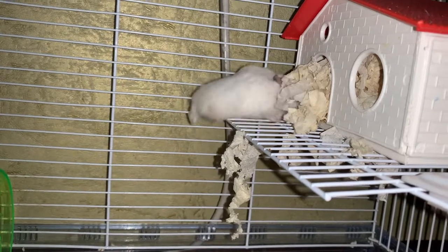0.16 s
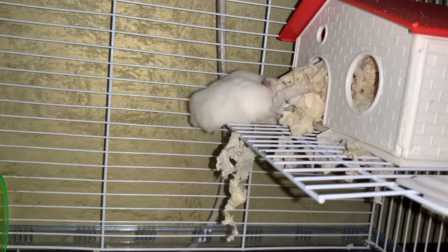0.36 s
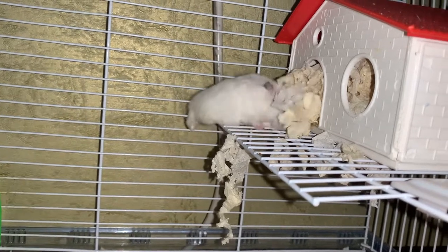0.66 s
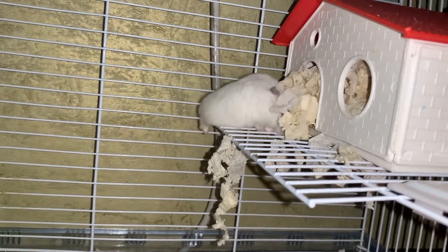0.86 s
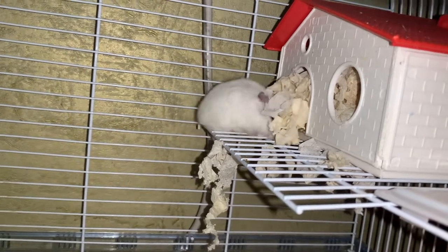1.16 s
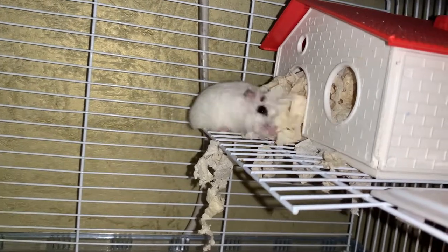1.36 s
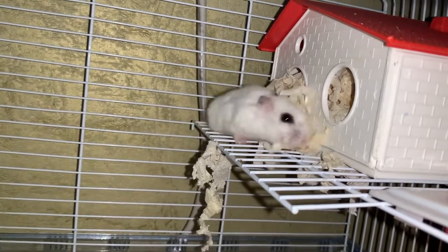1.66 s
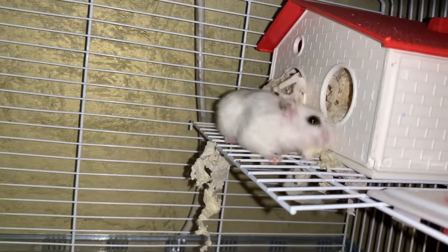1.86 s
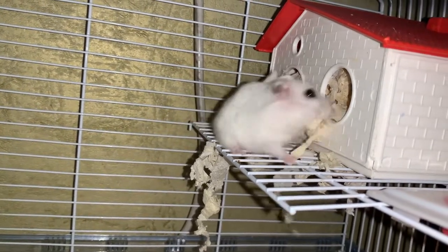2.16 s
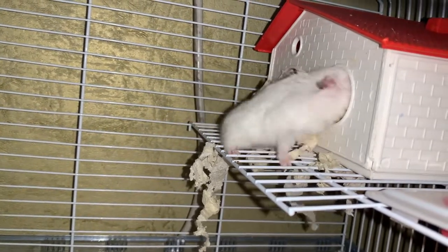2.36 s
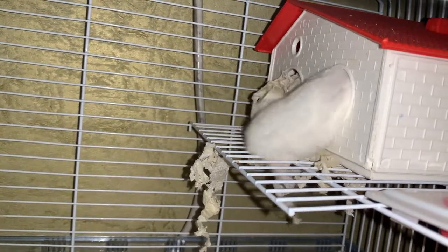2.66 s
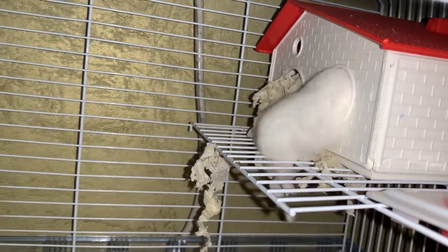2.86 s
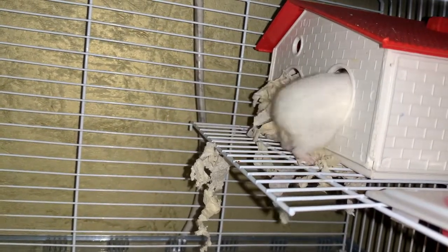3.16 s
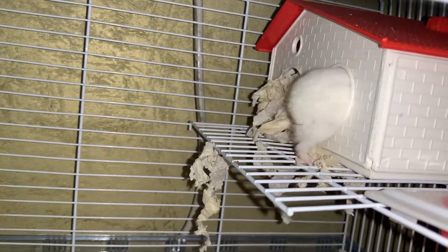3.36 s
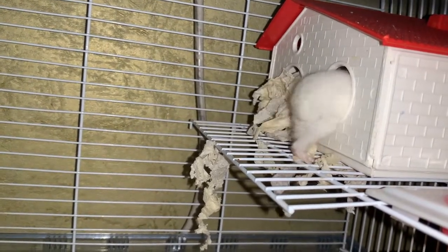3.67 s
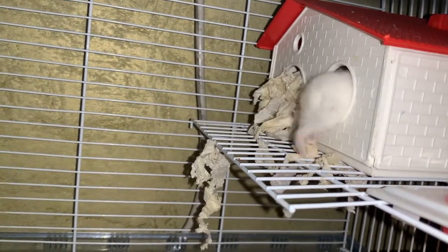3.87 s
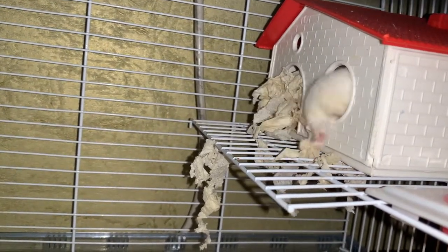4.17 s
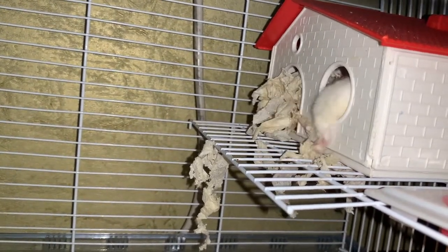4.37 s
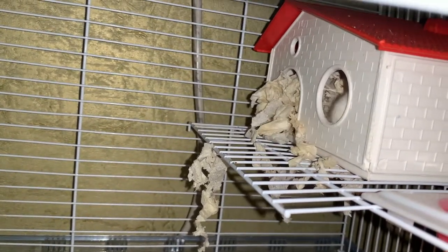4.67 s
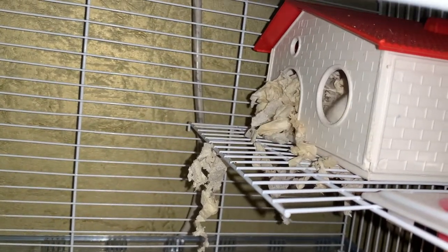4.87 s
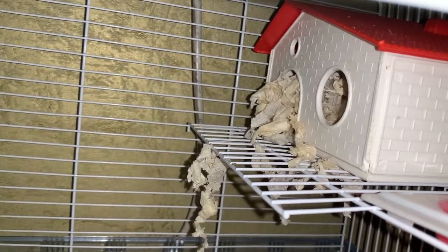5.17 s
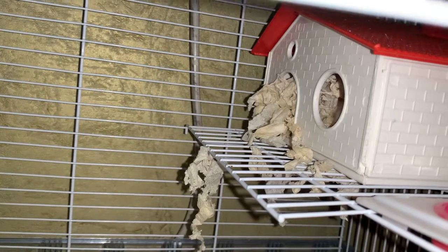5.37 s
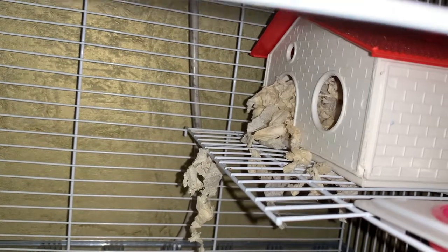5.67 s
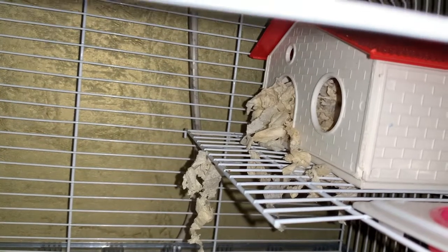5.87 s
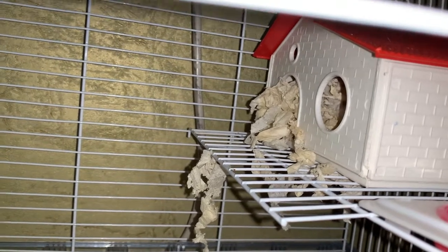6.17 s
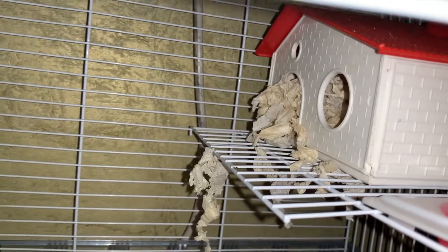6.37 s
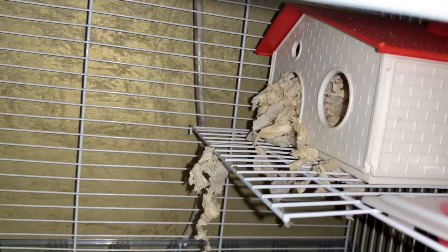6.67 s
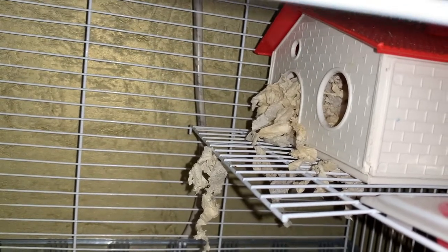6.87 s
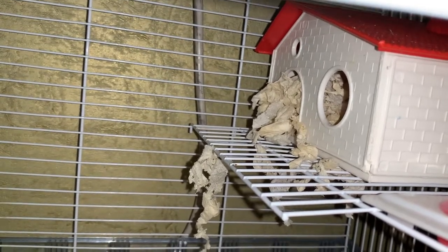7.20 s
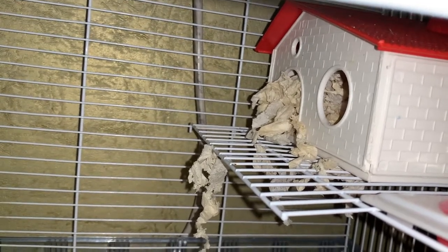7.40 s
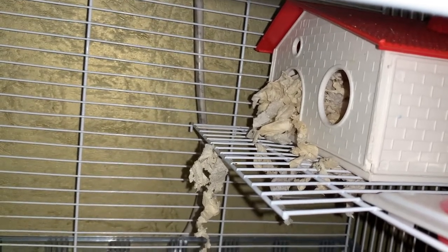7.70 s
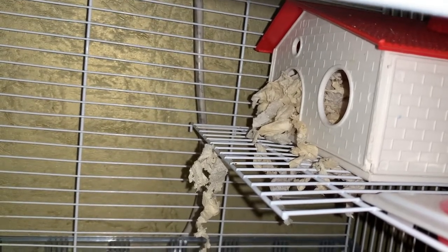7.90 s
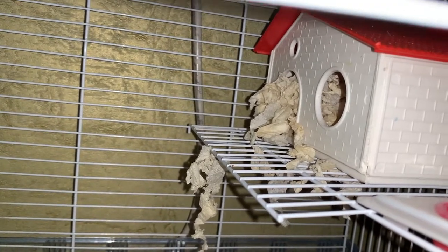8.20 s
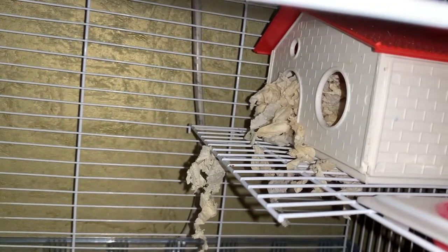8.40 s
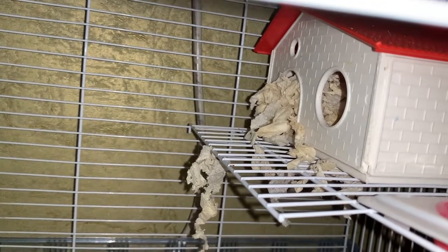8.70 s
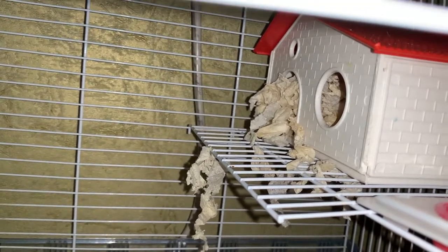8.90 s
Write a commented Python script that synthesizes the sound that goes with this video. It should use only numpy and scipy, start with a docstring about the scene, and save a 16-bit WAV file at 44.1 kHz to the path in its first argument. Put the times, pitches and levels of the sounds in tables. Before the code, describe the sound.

A hamster's claws tick on cage wire and paper bedding rustles softly, with dull plastic knocks over a low room hum.

```python
"""Mains hum, a slowly rising motor whine and rumble fill a quiet room; at once, claws tick on wire.
A hamster climbs over a wire shelf into a plastic house stuffed with paper, close to a two-port
microphone. Pushed paper rustles in tiny snaps, contacts ring the house walls as dull knocks,
and rubbed wires sing briefly. Later, scuffs excite the air inside the house."""
import sys
import numpy as np
from scipy import signal
from scipy.fft import rfft, irfft, next_fast_len
from scipy.io import wavfile
from scipy.ndimage import uniform_filter1d

SR = 44100
rng = np.random.default_rng(int(sys.argv[2]) if len(sys.argv) > 2 else 0)


def unload_wav(signal):
    """Save mono or channel-first audio to the path in sys.argv[1] as 16-bit WAV at rate SR, clipped to [-1, 1]."""
    wavfile.write(
        sys.argv[1],
        SR,
        np.round(np.clip(np.atleast_2d(signal).T, -1, 1) * 32767).astype(np.int16),
    )


N = 398884


def amp(db):
    """Decibels to gain."""
    return 10 ** (np.asarray(db) / 20)


def unit_rms(x):
    """Scale to rms 1."""
    return x / np.sqrt(np.mean(x ** 2) + 1e-20)


def over_frequency(rows, hz):
    """Table columns interpolated over log frequency."""
    row_hz, *columns = np.transpose(rows)
    return [np.interp(np.log(hz + 1), np.log(row_hz + 1), c) for c in columns]


def over_time(rows):
    """A (t/s, value) curve at every sample."""
    return np.interp(np.arange(N) / SR, *np.transpose(rows))


def drift(knots_per_s):
    """Random wander between unit-variance knots."""
    return np.interp(np.arange(N) / SR * knots_per_s, np.arange(400), rng.standard_normal(400))


def colour(x, gain):
    """Filter by a gain function of frequency."""
    size = next_fast_len(x.shape[-1])
    spectrum = rfft(x, size) * gain(np.fft.rfftfreq(size, 1 / SR))
    return irfft(spectrum, size)[..., :x.shape[-1]]


def resonance(hz, centre_hz, width_hz):
    """Gain of one resonance."""
    return 1 / np.sqrt(1 + (2 * (hz - centre_hz) / width_hz) ** 2)


def band_power(bands, hz):
    """Summed power of steep resonant bands."""
    return sum((amp(db) * resonance(hz, f, width_hz) ** 2) ** 2 for f, width_hz, db in bands)


def add(mix, start_s, sound):
    """Mix a sound in at start_s."""
    part = mix[:, max(round(start_s * SR), 0):][:, :sound.shape[1]]
    part += sound[:, :part.shape[1]]


def tone(hz, db, pan_db, lead_rad):
    """A sine on both ports; the left is louder by pan_db and ahead by lead_rad."""
    phase = 2 * np.pi * (np.cumsum(hz * np.ones(N)) / SR + rng.random())
    return np.sqrt(2) * amp(db) * np.array([np.sin(phase), amp(-pan_db) * np.sin(phase - lead_rad)])


# Third harmonic of the hum: t/s, level/dB
HUM_THIRD = [(0, -60), (2.2, -58), (3.0, -66.5), (3.8, -87), (6.4, -78.5), (7.1, -60), (9.04, -57.5)]
# Steady tones: f/Hz, level/dB, pan/dB, left lead/rad
STEADY_TONES = [(99.97, -53.5, 8, 1)]


def mains_hum():
    """Two hums a fraction of a hertz apart beat, beside a third harmonic and a steady tone."""
    weaker_ratio, beat_hz, quietest_s = 0.54, 0.14, 4.71
    t = np.arange(N) / SR
    beat = abs(1 - weaker_ratio * np.exp(2j * np.pi * beat_hz * (t - quietest_s)))
    hum = beat * tone(120.03, -46 + 0.62 * drift(6.3), pan_db=5.6, lead_rad=0.57)
    third = tone(360.1, over_time(HUM_THIRD) + 1.2 * drift(7.6), pan_db=5.5, lead_rad=-0.9)
    steady = sum(tone(hz, db + 2 * drift(5.1), pan, lead) for hz, db, pan, lead in STEADY_TONES)
    return hum + third + steady


# Motor pitch: t/s, f/Hz
MOTOR_PITCH = [(0, 270.4), (.5, 275.3), (1.2, 289.1), (1.7, 301.1), (2.1, 306.5), (2.6, 310), (6.8, 311.3),
               (7.45, 316.6), (7.9, 320.7), (8.3, 322.7), (8.65, 321.6), (9.04, 318.6)]
# Room response by motor pitch: f/Hz, whine/dB, upper tone/dB, even overtone base/dB
MOTOR_LEVELS = [(270, -58, -90, -95), (276, -69, -90, -92), (288, -64, -90, -95), (301, -53, -78, -91),
                (307, -55.5, -67, -90), (310, -58.5, -62.5, -91), (313, -58.5, -63, -90),
                (316.5, -52.5, -68, -82), (321, -56, -76, -82), (325, -57.5, -76, -85)]


def motor_whine():
    """Pitch follows motor speed; the room favours some pitches."""
    hz = over_time(MOTOR_PITCH)
    whine_db, upper_db, even_db = over_frequency(MOTOR_LEVELS, hz)
    whine = tone(hz, whine_db + drift(6), pan_db=3.34, lead_rad=0.71)
    upper = tone(1.1435 * hz, upper_db + 1.4 * drift(7.6), pan_db=6, lead_rad=-0.22)
    second = tone(2 * hz, even_db + 4, pan_db=7, lead_rad=-0.8)
    fourth = tone(4 * hz, even_db - 2, pan_db=8, lead_rad=-0.9)
    return whine + upper + second + fourth


# Room and microphone noise, left port: f/Hz, density/(dB per Hz)
ROOM_FLOOR = [(20, -100), (40, -81), (60, -76), (150, -74), (260, -84), (500, -93), (660, -101.5),
              (780, -105), (1200, -105.5), (2000, -113), (3500, -119.5), (6000, -124), (9500, -122),
              (15500, -126)]
# Narrow bands above that floor: f/Hz, width/Hz, peak density/(dB per Hz)
ROOM_BANDS = [(182.8, 6.5, -68.5), (232, 8.8, -72), (912, 14, -100), (1350, 6, -103), (1580, 20, -105),
              (2360, 20, -109), (2490, 14, -108), (2970, 25, -112), (3640, 25, -114), (10100, 69, -118),
              (11380, 90, -116)]


def room_rumble():
    """Low noise with a few narrow bands, gently swelling."""
    def timbre(hz):
        return np.sqrt(amp(over_frequency(ROOM_FLOOR, hz)[0]) ** 2 + band_power(ROOM_BANDS, hz))
    noise = colour(rng.standard_normal((2, N)), timbre) * np.sqrt(SR / 2)
    return noise * amp(0.7 * drift(4))


# Claws on the wire: t/s, level/dB, body re tick/dB
CLAW_TICKS = [(.031, -64.5, -13), (.388, -72, -10), (0.095, -68, -6), (.716, -64, -20), (.726, -67, -20),
              (.95, -63.5, -5), (1.386, -54, -14), (1.431, -55.5, -1), (1.4457, -53, -9), (1.464, -52, -10),
              (1.501, -52, -15), (1.522, -53, -5), (1.545, -59, -12), (1.562, -55, -21),
              (1.7185, -58.5, -10), (1.7722, -66, -19), (1.855, -59, -25), (1.9654, -56.5, -27),
              (2.0214, -53, -24), (2.086, -52, -23), (2.0942, -47.5, -11), (2.0975, -46.5, -18),
              (2.167, -65.5, -2), (2.176, -71, -13), (2.251, -60, -17), (2.2572, -43.5, -13),
              (2.2595, -45, -12), (2.2753, -47, -12), (2.282, -54, -14), (2.3805, -60, -8),
              (2.42, -62.5, -3), (2.505, -64, -3), (2.651, -65, -6), (3.0794, -70, -6), (4.0428, -70, -20),
              (4.1895, -73.5, -16), (4.2197, -70, -19)]


def claw_ticks():
    """A claw on wire gives a bright burst with a weaker body; harder ticks are shorter."""
    soft_db, soft_rise_s, soft_t60_s, halving_db = -61, 0.0028, 0.03, 14
    corners_hz = [500, 2000, 5000, 7500]
    out, t = np.zeros((2, N)), np.arange(4096) / SR
    for at_s, db, body_db in CLAW_TICKS:
        corners_db = [body_db - 25, body_db, body_db, 0]
        burst = colour(rng.standard_normal((2, len(t))),
                       lambda hz: amp(np.interp(hz, corners_hz, corners_db)))
        stretch = 2 ** ((soft_db - db) / halving_db)
        rise_s, t60_s = soft_rise_s * stretch, soft_t60_s * stretch
        envelope = np.minimum(t / rise_s, 1) * amp(-60 * np.maximum(t - rise_s, 0) / t60_s)
        add(out, at_s - rise_s / 2, amp(db) * unit_rms(burst) * envelope)
    return out


# Bouts of pushing paper: t/s, length/s, level/dB
PAPER_BOUTS = [(0.075, 0.015, -79), (0.196, 0.016, -75), (0.38, 0.072, -71), (0.448, 0.054, -67.5),
               (.52, .09, -73), (.621, .028, -66), (.66, .04, -73), (0.702, 0.023, -62.5),
               (0.736, 0.038, -60), (0.771, 0.031, -67.5), (0.807, 0.15, -68.5), (1.367, .11, -71.5),
               (1.473, .16, -63.5), (1.689, 0.21, -68.5), (1.907, 0.115, -70.5), (2.01, 0.1, -66.5),
               (2.114, .04, -77), (2.156, 0.076, -71.5), (2.235, 0.063, -66), (2.309, 0.05, -62.5),
               (2.384, 0.04, -68), (2.44, .04, -76), (2.492, 0.037, -72), (2.54, 0.063, -77.5),
               (2.63, 0.075, -74), (3.038, 0.054, -78), (3.395, .015, -80), (3.6, .097, -77),
               (3.86, 0.058, -77), (4.03, 0.054, -74.5), (4.237, 0.076, -75.5), (4.403, 0.074, -76),
               (4.597, 0.15, -79.5), (5.502, 0.23, -83.5)]


def paper_envelope():
    """Each bout swells, holds unevenly and dies away; powers add."""
    rise_s, t60_s, stir_db = 0.026, 0.11, 1.5
    power, t = np.zeros(N), np.arange(N) / SR
    for start_s, length_s, db in PAPER_BOUTS:
        swell = np.clip((t - start_s) / rise_s + 0.5, 0, 1)
        fall_db = 60 * np.clip((t - start_s - length_s) / t60_s, 0, 2)
        power += (swell * amp(db - fall_db)) ** 2
    return np.sqrt(power) * amp(stir_db * drift(35))


# Paper spectrum: f/Hz, gain/dB
PAPER_SPECTRUM = [(500, 9), (1500, 8), (3000, -17), (5500, -17), (6500, -8), (8300, -4.5), (11000, -1.5),
                  (15000, -4.5)]
# Wires ringing with the rustle: f/Hz, width/Hz, gain/dB
WIRE_MODES = [(2410, 460, 2), (3260, 590, -0.5), (4400, 280, -3.5), (6950, 410, -3), (10000, 750, -5)]


def paper_rustle():
    """Dense tiny snaps of uneven size over a fizz, riding the animal's movements."""
    def timbre(hz):
        ring = sum(amp(db) * resonance(hz, f, width_hz) for f, width_hz, db in WIRE_MODES)
        return amp(over_frequency(PAPER_SPECTRUM, hz)[0]) + ring
    snaps_per_s, snap_decay_s, fizz, flare_db = 500, 0.0012, 2.5, 2
    sizes = amp(3 * np.minimum(rng.exponential(1, N), 5))
    impulses = sizes * (rng.random(N) < snaps_per_s / SR)
    snaps = signal.lfilter([1], [1, -np.exp(-1 / (snap_decay_s * SR))], impulses)
    grain = rng.standard_normal((2, N)) * (fizz + unit_rms(snaps))
    spectra = signal.stft(colour(grain, timbre), nperseg=256)[2]
    # Each scrap has its own colour: spectral patches flare and fade.
    patches = uniform_filter1d(rng.standard_normal(spectra.shape[1:]), size=5, axis=0)
    patches = unit_rms(uniform_filter1d(patches, size=20, axis=1))
    scraps = signal.istft(spectra * amp(flare_db * patches), nperseg=256)[1][:, :N]
    return unit_rms(scraps) * paper_envelope()


def contacts(rows, modes, rise_per_t60):
    """Each rough contact excites the modes near its own band."""
    out, t = np.zeros((2, N)), np.arange(16384) / SR
    for start_s, db, centre_hz, width_oct, t60_s in rows:
        def timbre(hz):
            offset_oct = np.log2(hz / centre_hz + 1e-9)
            return np.sqrt(band_power(modes, hz)) * np.exp(-0.5 * (offset_oct / width_oct) ** 2)
        ring = unit_rms(colour(rng.standard_normal((2, len(t))), timbre))
        rise_s = rise_per_t60 * t60_s
        envelope = np.minimum(t / rise_s, 1) ** 2 * amp(-60 * np.maximum(t - rise_s, 0) / t60_s)
        add(out, start_s, amp(db) * ring * envelope)
    return out


# Knocks and scrapes on the house: t/s, level/dB, f/Hz, width/oct, t60/s
HOUSE_KNOCKS = [(.612, -63, 1300, .5, .4), (.876, -54, 1300, .5, .3), (.891, -63, 2800, .7, .05),
                (.89, -61, 1150, .3, .7), (.885, -58, 620, .3, .25), (1.694, -54, 700, .7, .28),
                (1.705, -60, 900, .6, .06), (2.168, -66, 1400, .5, .2), (2.195, -64, 650, .4, .25),
                (2.325, -58, 1200, .5, .2), (2.62, -69, 2000, .5, .35), (2.962, -63, 600, .5, .1),
                (3.043, -65, 620, .5, .08), (6.118, -68, 700, .5, .07), (7.616, -67, 650, .5, .07),
                (8.462, -54, 1700, .15, .25), (8.468, -46.5, 620, .45, .2), (8.468, -52, 4600, .9, .2),
                (8.49, -65, 3000, .4, .24)]
# Wall modes: f/Hz, width/Hz, gain/dB
WALL_MODES = [(517, 290, 7), (637, 83, 12), (936, 200, 2.5), (1200, 560, -1.5), (1653, 300, -5),
              (2030, 420, -12), (2480, 820, -12.5), (3100, 180, -8.5), (3460, 260, -10), (4120, 220, -16),
              (4800, 300, -15), (5300, 190, -14), (6400, 4100, -32), (7450, 410, -27), (8450, 550, -19),
              (10070, 370, -17), (10500, 200, -18)]


def house_knocks():
    """The plastic walls ring dully when bumped."""
    return contacts(HOUSE_KNOCKS, WALL_MODES, rise_per_t60=0.057)


# Rubs on single wires: t/s, length/s, f/Hz, level/dB
WIRE_RUBS = [(.76, .09, 4500, -78), (.765, 0.22, 2330, -71.5), (1.439, 0.12, 4440, -74),
             (1.695, 0.086, 3310, -78), (1.70, .1, 4450, -86), (1.822, 0.077, 4540, -76.5),
             (1.887, 0.093, 4260, -83), (2.028, 0.09, 4430, -81), (2.301, .065, 4600, -77),
             (2.31, 0.037, 3220, -83), (2.44, 0.069, 4420, -79), (2.62, 0.064, 2750, -77),
             (2.77, 0.088, 2800, -86)]


def wire_rubs():
    """A rubbed wire sings: friction noise held in one narrow resonance."""
    out = np.zeros((2, N))
    for start_s, length_s, ring_hz, db in WIRE_RUBS:
        friction = rng.standard_normal((2, 12000))
        ring = unit_rms(colour(friction, lambda hz: resonance(hz, ring_hz, width_hz=100) ** 2))
        envelope = signal.windows.tukey(round(length_s * SR), 0.8)
        add(out, start_s, amp(db) * ring[:, :len(envelope)] * envelope)
    return out


# Scuffs inside the house: t/s, level/dB, f/Hz, width/oct, t60/s
HOUSE_SCUFFS = [(4.27, -72, 2200, .8, .35), (4.365, -72, 2200, .7, .12), (4.405, -69, 2200, .7, .3),
                (4.445, -71, 2100, .6, .25), (4.585, -73, 1800, .5, .2), (4.615, -68, 2200, .6, .35),
                (4.845, -73, 2600, .4, .35), (5.63, -70, 2000, .9, .5), (6.6, -67, 2150, .45, .42)]
# Modes of the enclosed air: f/Hz, width/Hz, gain/dB
AIR_MODES = [(1190, 200, 5.5), (1630, 150, 0), (1853, 110, 2.5), (2210, 200, -5), (2530, 210, -4),
             (2790, 200, -8), (3230, 150, -3), (3740, 330, -14), (4300, 580, -10)]


def house_scuffs():
    """Scuffs excite the air in the house, swelling more slowly than knocks."""
    return contacts(HOUSE_SCUFFS, AIR_MODES, rise_per_t60=0.077)


# Port pair: f/Hz, likeness/(0-1), left over right/dB, left lead besides the time offset/rad
PORT_RESPONSE = [(39, 0.04, 0, 1.5), (90.4, 0.64, -4.5, 1.49), (169, 0.81, 3.5, 1.15), (446, 0.26, 4, 0.18),
                 (1250, 0.78, 7, 0.63), (2140, 0, 4.5, 0.15), (3930, 0.26, 2, 0.43), (5770, 0, 0, 1.7),
                 (6600, 0.6, 1, 1.9), (7600, 1, -0.5, 1.53), (15100, 0.93, -1, 1.8)]


def microphone_ports(pair):
    """The right port hears a time- and phase-shifted copy of the left plus an unrelated part."""
    right_ahead_s = 0.000206
    def right_gains(hz):
        likeness, pan_db, lead_rad = over_frequency(PORT_RESPONSE, hz)
        likeness = np.clip(likeness, 0, 1)
        weights = np.array([likeness, np.sqrt(1 - likeness ** 2)])
        phase_rad = 2 * np.pi * hz * right_ahead_s - lead_rad
        return weights * amp(-pan_db) * np.exp(1j * phase_rad)
    return np.array([pair[0], colour(pair, right_gains).sum(0)])


def scene():
    """Noisy sources pass through the ports; tones carry their own direction."""
    noises = room_rumble() + claw_ticks() + paper_rustle() + house_knocks() + wire_rubs() + house_scuffs()
    return microphone_ports(noises) + mains_hum() + motor_whine()


def record(dry):
    """Microphone bass cut, then the band limit."""
    low_hz, high_hz = 35, 15700
    bass_cut = signal.butter(3, low_hz, "high", fs=SR, output="sos")
    band_limit = signal.firwin(511, high_hz, window=("kaiser", 9), fs=SR)
    return signal.oaconvolve(signal.sosfilt(bass_cut, dry), band_limit[None], "same")


dry = scene()
out = record(dry)
unload_wav(out)
```